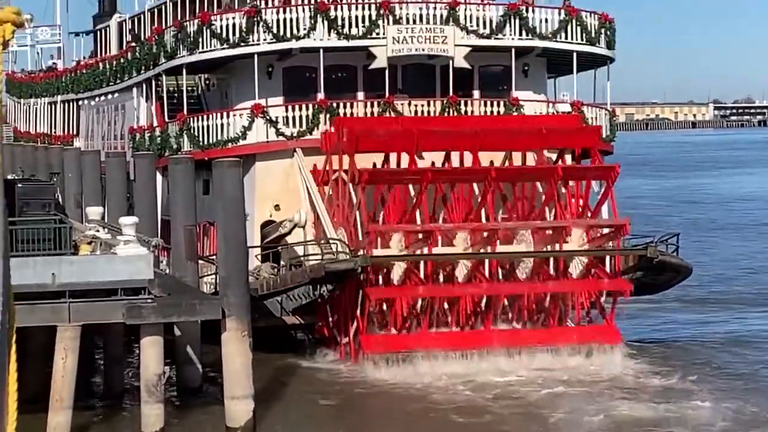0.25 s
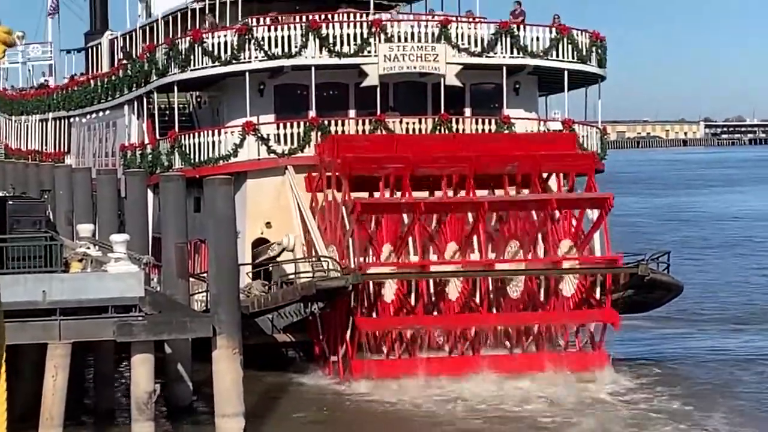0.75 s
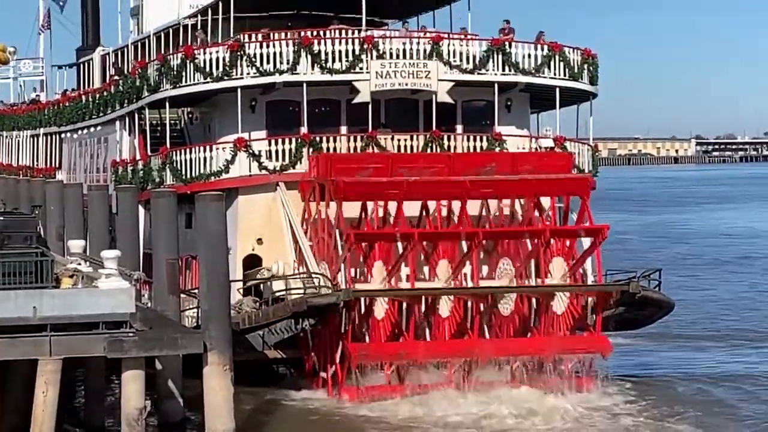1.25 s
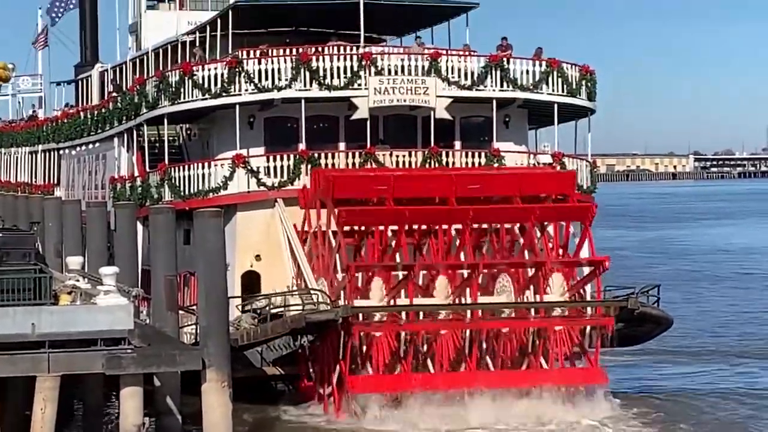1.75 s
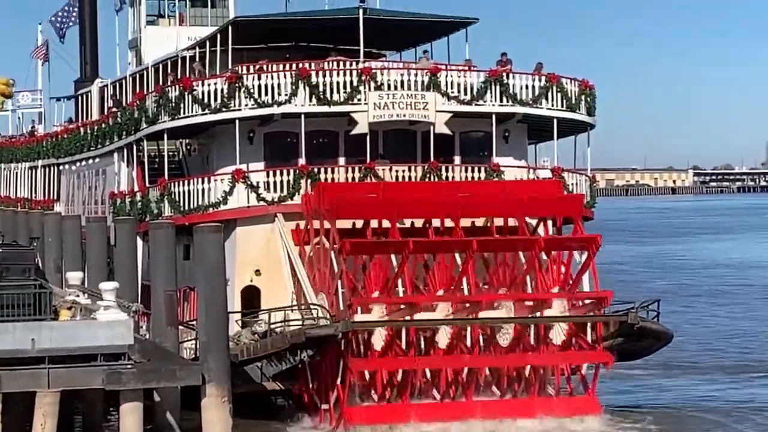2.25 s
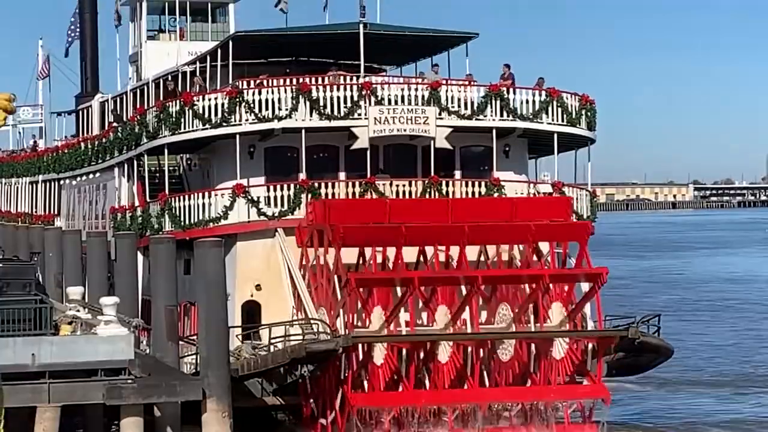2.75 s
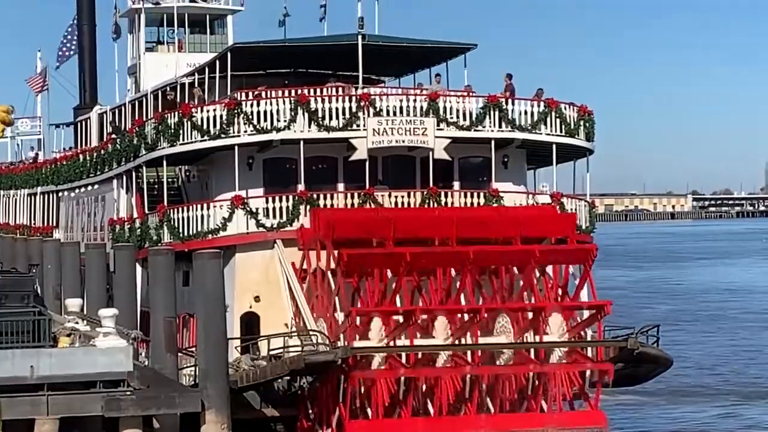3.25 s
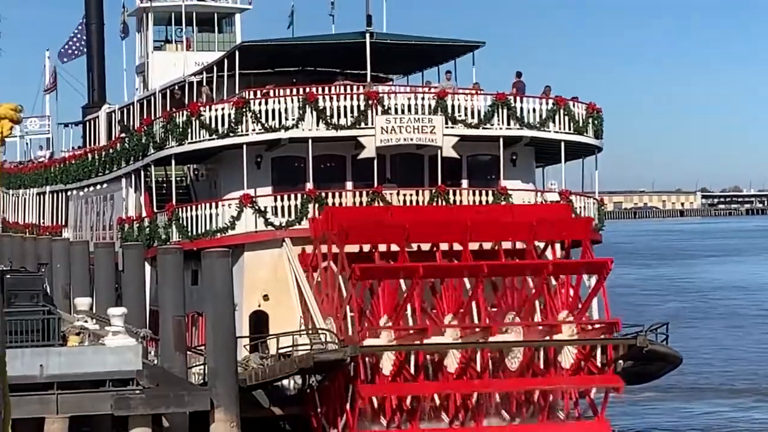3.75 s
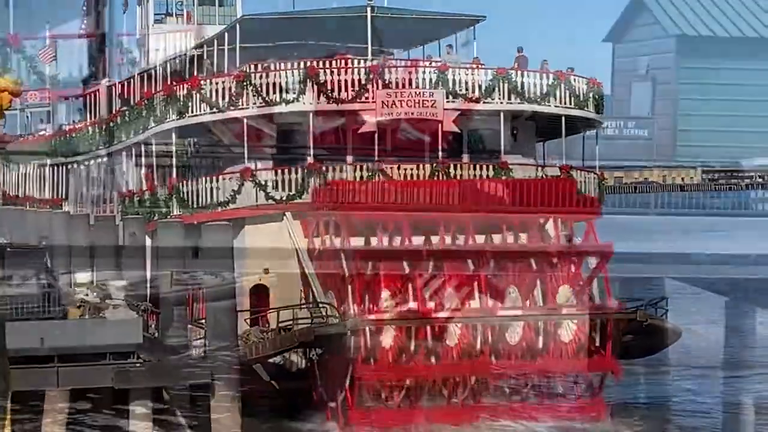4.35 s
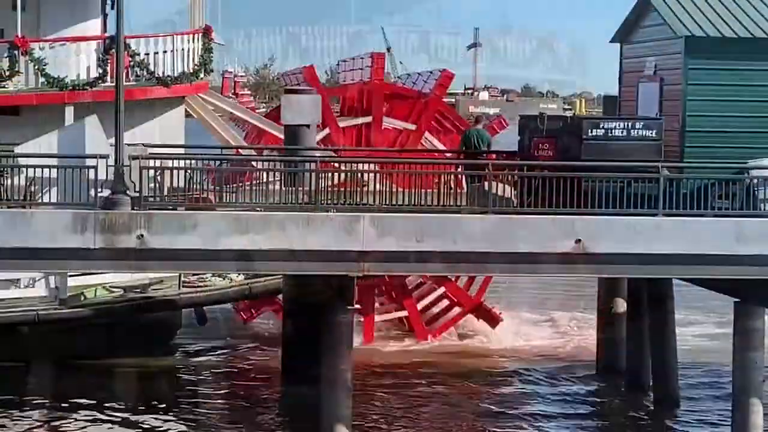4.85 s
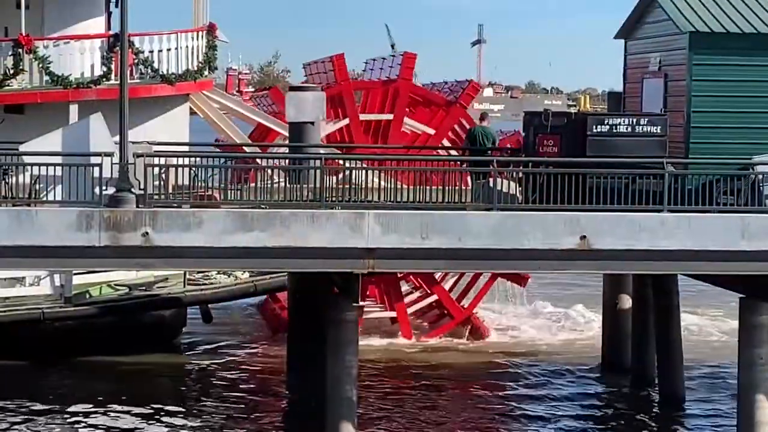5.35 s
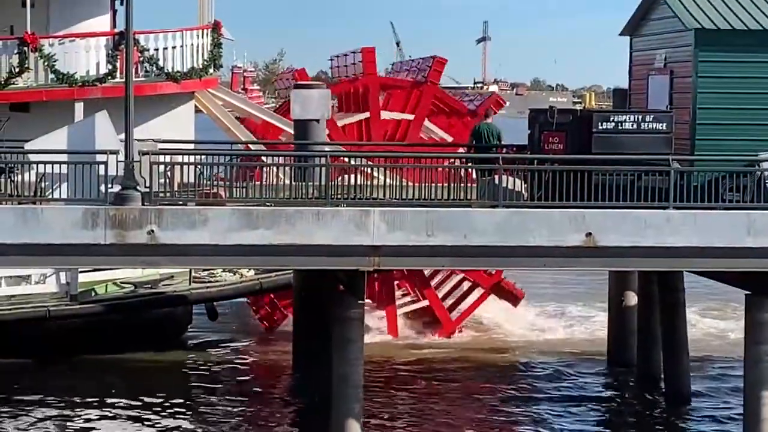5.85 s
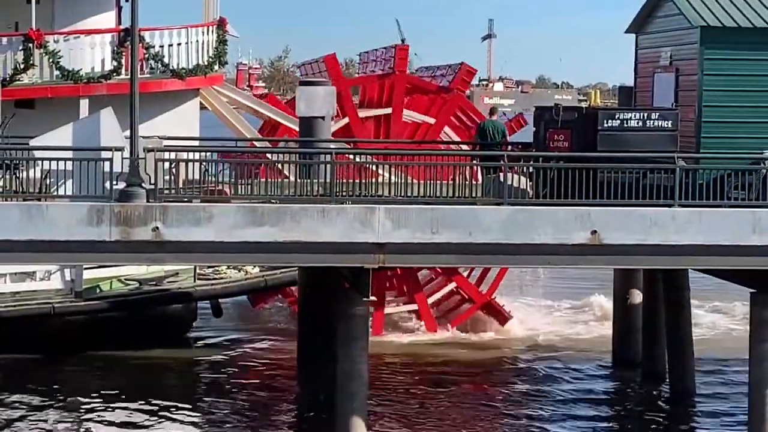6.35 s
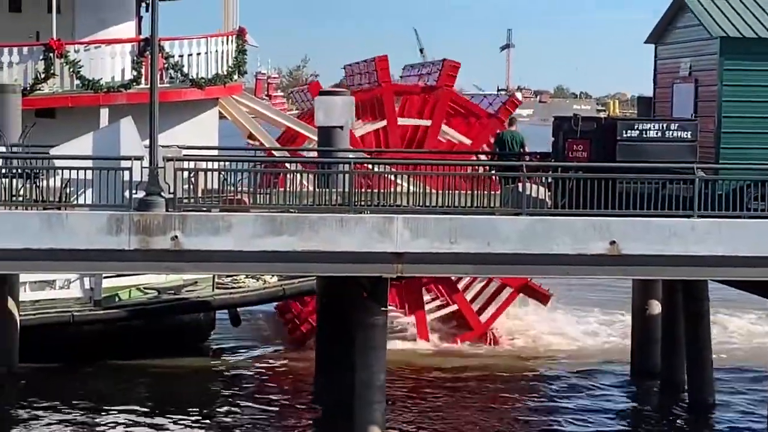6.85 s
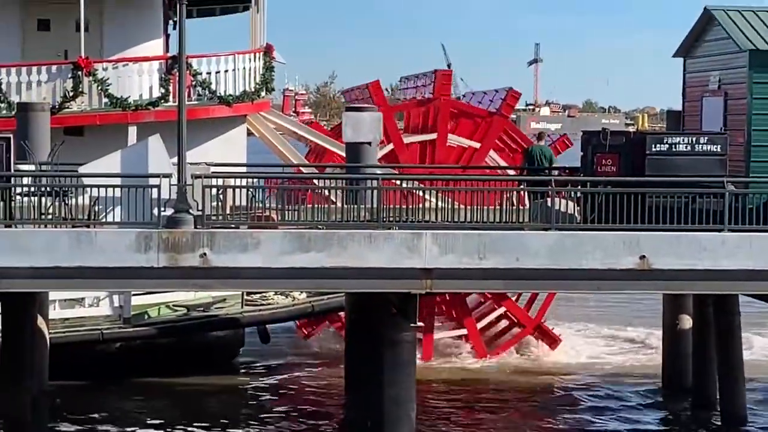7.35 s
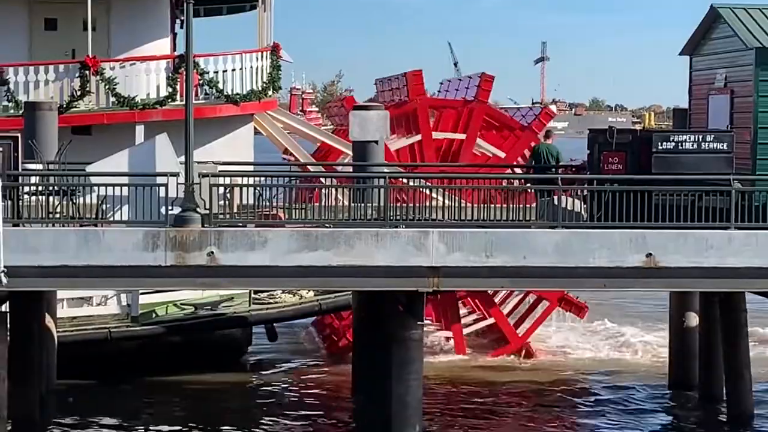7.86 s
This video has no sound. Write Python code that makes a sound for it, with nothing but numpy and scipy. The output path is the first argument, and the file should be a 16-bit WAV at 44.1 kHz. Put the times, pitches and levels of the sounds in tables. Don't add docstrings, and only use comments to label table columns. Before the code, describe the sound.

Beside a river dock, a big paddle wheel turns steadily. Each blade slaps in with a soft swell of splash and spray about every 0.7 seconds, over a continuous bubbly roar. A boat engine throbs low underneath. Wind rumbles and flutters on the handheld stereo microphone, strongest at the start, with occasional dull thumps.

```python
import sys
import numpy as np
from scipy import signal
from scipy.fft import rfft, irfft, next_fast_len
from scipy.io import wavfile
from scipy.ndimage import uniform_filter1d, map_coordinates

SR = 44100
rng = np.random.default_rng(int(sys.argv[2]) if len(sys.argv) > 2 else 0)


def store_pcm(level_fs):
    pcm = np.round(np.clip(level_fs, -1, 1) * 32767).astype(np.int16)
    wavfile.write(sys.argv[1], SR, np.atleast_2d(pcm).T)


def volts(x):
    e = np.asarray(x, float) / 20
    return 10 ** e


N = 358159

# (pitch [Hz], level [dB per Hz])
WIND_COLOUR = [(15, -29), (24, -13), (35, 1), (50, 3), (80, -1.5), (130, -11.5), (220, -16.5), (300, -23.5),
               (380, -28), (600, -61)]
# (pitch [Hz], likeness [0-1])
WIND_ALIKE = [(30, 0.64), (60, 0.55), (120, 0.39), (210, 0.9), (320, 0.99)]
# (time [s], level [dB])
WIND_STRENGTH = [(0.0, -20), (.3, -24), (.55, -35), (.8, -29), (1.15, -26), (1.4, -30), (1.8, -29),
                 (2.1, -31), (3.2, -33.5), (3.6, -27.5), (4.2, -25.5), (4.9, -33), (5.3, -22.5),
                 (5.8, -25.5), (6.3, -27), (6.6, -28.5), (6.995, -35.5), (7.3, -27.5)]
# (time [s], level over the steady flutter [dB])
GUSTS = [(.12, 2.5), (.23, 8), (.4, 3), (.8, 3), (1.15, 2.5), (1.79, 6), (2.05, -1), (2.65, 0.5),
         (2.838, 4), (3.74, 3), (4.39, 0), (4.8, 1), (5.24, 3), (5.42, -3.5), (5.71, 5), (6.42, 2),
         (6.53, 4.5), (6.7, 2.5), (7.15, 3.5), (7.28, 4.5), (7.92, 1)]
# (time [s], level [dB], pitch [Hz], length [cycles], first way [1 up, -1 down])
THUMPS = [(.215, -24, 110, .6, 1), (.27, -20, 110, .6, 1), (1.781, -22, 220, .6, 1),
          (1.787, -14, 125, .65, 1), (2.648, -14, 100, .55, -1), (2.835, -16, 100, .55, -1),
          (3.735, -22, 120, .6, 1), (5.376, -12.5, 150, .42, 1), (7.4335, -15, 125, .55, -1),
          (7.4375, -12.5, 122, .6, 1), (7.4588, -14, 320, .5, 1), (7.4636, -15, 190, .5, -1),
          (7.473, -16.5, 100, 1.1, -1)]

# (time [s], firing note level [dB], level of the note below it [dB])
ENGINE = [(0.0, -24, -43), (.85, -18.5, -41), (1.1, -23.5, -28), (1.3, -28, -45), (1.75, -57, -30),
          (2.05, -33.5, -26), (2.5, -24.5, -30), (3.25, -22, -32), (3.75, -27, -36), (4.1, -29, -51),
          (4.75, -34.5, -33.5), (5.2, -36, -21.5), (5.55, -24, -33), (6.0, -21, -34), (6.75, -28.5, -22.5),
          (7.3, -43, -52), (7.8, -28, -38), (8.12, -20.5, -26)]

# (time [s], level [dB], pitch [Hz], length [cycles])
AIR_POCKETS = [
    (.86, -32, 612, 7.7),
    (2.52, -31.5, 1220, 16),
    (2.985, -31, 564, 6.1),
    (3.03, -37, 530, 9.2),
    (3.055, -33, 677, 11),
    (3.135, -31.5, 608, 15),
    (4.49, -37, 695, 16),
    (4.84, -37, 733, 18),
    (6.67, -37, 651.8, 11),
]

# (time [s], strength over the roar [dB], draining time [s])
BLADES = [(.25, 5.5, 0.21), (.93, 5.5, 0.21), (1.62, 4, .3), (2.32, 6, 0.25), (2.99, 5.5, .26),
          (3.75, 4, .1), (4.49, 5, 0.17), (5.2, 6.5, .12), (5.94, 5, 0.12), (6.68, 5.5, 0.12),
          (7.41, 6.5, .14), (8.13, 3.5, .15)]
# (time [s], level [dB])
SLOSHES = [(.55, 1.5), (1.15, 0), (1.87, 0.5), (3.25, 0.5), (3.51, 2), (3.63, 1), (4.75, 1.5), (4.95, 1.5),
           (5.6, 2), (5.8, 2.5), (6.19, 2.5), (7.0, 1.5)]
# (pitch [Hz], level [dB per Hz])
WATER_COLOUR = [(200, -1), (340, -4.5), (430, -2), (690, 1), (860, -6), (1290, -3.5), (1550, -9),
                (1810, -4.5), (1890, -6.5), (2070, -16.5), (2240, -12.5), (2540, -16.5),
                (3450, -15), (3700, -17), (4480, -17.5), (5080, -22.5), (5680, -16), (7320, -22.5),
                (8100, -19.5), (8950, -18.5),
                (9050, -17), (9350, -25), (9700, -25.5), (10450, -20), (11000, -29.5), (11950, -20),
               (12100, -24.5), (12800, -32), (13400, -38), (13800, -32), (14200, -39), (14300, -29)]
# (pitch [Hz], likeness [0-1])
WATER_ALIKE = [(340, 0.95), (700, 0.84), (860, 0.67), (1100, 0.7), (1350, 0.96), (1550, 0.061),
               (1810, 0.99), (2070, 0.59), (2330, 0.63), (2580, 0.14),
               (2850, 0.41), (3190, 0.22), (3450, 0.39), (3650, 0.11), (4100, 1), (4500, 0.44),
               (4800, 0.53), (5400, 0.71), (6000, 0.46), (6460, 0.22), (7750, .99), (8100, 1), (9100, 1),
               (9400, 0.023)]
# (pitch [Hz], level difference [dB])
PORT_BALANCE = [(340, 0.1), (1550, -2), (2330, -0.6), (2670, 3), (2930, 2), (3100, 0.5), (3530, -3.5),
                (4130, 0.5), (5170, 5), (6720, -1), (8350, 0), (8960, -0.5)]
# (pitch [Hz], phase [radians])
PORT_LEAD = [(800, 0), (1500, -.3), (2150, 1), (2500, .5), (2950, -3), (3500, 1.3), (3700, .3), (4050, 0),
             (5200, 3.1), (6250, 4), (6600, 1.3), (7800, 0), (8950, -2.3), (9020, 0)]
ROAR_DB = [-37, -40, -50.5, -52]
BLADE_SHARES = [0.15, 0.67, 0.87, 0.77]
FLICKER_DB = [0.32, 0.13, 0.39, 0.75]

# (from [Hz], to [Hz], share of moments heard [0-1], smoothing [frames])
MID_KEPT = [(9000, 9350, .87, 2), (9350, 9500, .35, 2), (9500, 9700, .05, 1), (10550, 11300, .07, 1),
            (11300, 12000, .005, 1), (12900, 13200, .55, 3), (13200, 13550, .35, 2), (13550, 13750, .02, 1),
            (14280, 22050, 0, 1)]
SIDE_KEPT = [(9000, 9750, .33, 3), (9750, 10480, .06, 1), (11050, 11200, .06, 1), (11200, 11650, 0, 1),
             (12030, 12800, .015, 1), (12800, 13500, .02, 1), (13500, 14250, 0, 1), (14280, 14480, .4, 1),
             (14500, 22050, 0, 1)]
# (from [s], to [s], pull)
SIDE_FAVOURED = [(.1, .65, 1.2), (1.3, 2.25, 2.6), (2.25, 3.27, 1.2), (5.22, 5.45, 1.5)]


def unit(x):
    return x / np.sqrt(np.mean(np.mean(np.atleast_2d(x), axis=0) ** 2) + 1e-20)


def along(points, hz):
    f, v = np.transpose(points)
    return np.interp(np.log(hz + 1), np.log(f + 1), v)


def curves(rows):
    s, *cols = np.transpose(rows)
    return [np.interp(np.arange(N) / SR, s, c) for c in cols]


def wobble(rate):
    return map_coordinates(rng.standard_normal(400), [np.arange(N) * min(rate, 45) / SR])


def peak(s, rise_s, fall_s):
    t = np.arange(N) / SR - s
    return np.exp(-(t / np.where(t < 0, rise_s, fall_s)) ** 2)


def swing(s, db, hz, cycles):
    turns = (np.arange(N) / SR - s) * hz
    return -volts(db) * np.sin(2 * np.pi * turns) * np.exp(-(turns / cycles) ** 2)


def filtered(x, response):
    m = next_fast_len(N + SR // 2)
    return irfft(rfft(x, m) * response(np.fft.rfftfreq(m, 1 / SR)), m)[..., :N]


def patchy(patchy_db):
    z = signal.stft(rng.standard_normal((2, N)), nperseg=512)[2]
    field = uniform_filter1d(rng.standard_normal(z.shape[1:]), size=6, axis=0)
    field = uniform_filter1d(field, size=10, axis=1)
    return signal.istft(z * volts(patchy_db * field / field.std()), nperseg=512)[1][:, :N]


def spread(pair, colour, alike):
    def shares(hz):
        turn = np.arccos(np.clip(along(alike, hz), -1, 1)) / 2
        return volts(along(colour, hz)) * [np.cos(turn), np.sin(turn)]

    mid, side = filtered(pair, shares)
    return np.array([mid + side, mid - side])


def wind():
    strength_db, = curves(WIND_STRENGTH)
    lumps = volts(0.43 * wobble(9) + 1.7 * np.array([wobble(25), wobble(25)]))
    buffet = lumps * spread(patchy(patchy_db=0.7), WIND_COLOUR, WIND_ALIKE)

    flutter_hz = 83.3
    upper = lambda hz: hz ** 4 / (hz ** 4 + flutter_hz ** 4)
    rumble = unit(filtered(buffet, lambda hz: 1 - upper(hz)))
    flutter = unit(filtered(buffet, upper))

    gust_s = 0.05
    flutter_db = -35 + 0.1 * (strength_db - strength_db.mean())
    flutter_db += sum(db * peak(s, gust_s, gust_s) for s, db in GUSTS)
    return volts(strength_db - 1.0) * rumble + volts(flutter_db) * flutter


def thumps():
    return sum(np.sign(way) * swing(*jump) for *jump, way in THUMPS)


def engine():
    firing_db, below_db = curves(ENGINE)
    above_db = -31.5 + 0.47 * (firing_db - firing_db.mean())
    turns = 6.79 * np.arange(N) / SR
    # (multiple of the shaft rate, place in the cycle [turns], level [dB])
    notes = [(7, 0, below_db), (8, -.25, firing_db), (9, .03, above_db)]
    throb = 0
    for multiple, lag_turns, db in notes:
        phase = 2 * np.pi * (multiple * turns + lag_turns) + 0.27 * wobble(4.5)
        throb = throb + volts(db + 3 + 1.2 * wobble(8)) * np.cos(phase)
    return throb


def gulps():
    return sum(swing(*pocket) for pocket in AIR_POCKETS)


def bubbles(count, hz, octaves, cycles, scatter_db):
    draw, t = rng.random((count, 3)), np.arange(1200) / SR
    pitch = hz * 2 ** (octaves * (2 * draw[:, 1:2] - 1))
    age = t * pitch / cycles
    size = volts(-scatter_db * np.log(draw[:, 2:] + 0.0013)) * np.sqrt(pitch / hz)
    ring = size * age * np.exp(-3 * age) * np.sin(2 * np.pi * pitch * t * (1 + 0.12 * age))
    start = (draw[:, :1] * N).astype(int) + np.arange(len(t))
    return unit(np.bincount(start.ravel(), ring.ravel(), N + len(t))[:N])


def wheel():
    blade_db = sum(db * peak(s, 0.12, drain_s) for s, db, drain_s in BLADES)
    blade_db += sum(db * peak(s, 0.047, 0.047) for s, db in SLOSHES)

    pair = patchy(patchy_db=1.01)
    large = bubbles(count=3500, hz=907.0, octaves=1.203, cycles=7.64, scatter_db=1.5)
    small = bubbles(count=4000, hz=5500, octaves=1.1, cycles=6, scatter_db=1.8)
    pair[0] += volts(-19 + 0.86 * blade_db) * large + volts(-19) * small
    water = spread(pair, WATER_COLOUR, WATER_ALIKE)

    def ports(hz):
        left = volts(along(PORT_BALANCE, hz) / 2) * np.exp(-.5j * along(PORT_LEAD, hz))
        return np.array([left, 1 / left])

    water = filtered(water, ports)
    bands = [(0, 900), (900, 2400), (2400, 5000), (5000, SR)]  # wash, splash, spray, mist [Hz]
    spatter_db = 0.28 * wobble(25)
    roar = 0
    for (lo, hi), db, share, flicker_db in zip(bands, ROAR_DB, BLADE_SHARES, FLICKER_DB):
        layer = unit(filtered(water, lambda hz: (lo <= hz) & (hz < hi)))
        level_db = db + share * blade_db + spatter_db + 0.19 * wobble(12) + flicker_db * wobble(36)
        roar = roar + volts(level_db) * layer
    return roar


def scene():
    lean = volts(np.array([[.25], [-.25]]))
    return lean * (wind() + engine() + thumps()) + wheel() + gulps()


def thinned(x, kept, pull):
    hz, t, z = signal.stft(x, SR, nperseg=2048)
    favour = pull * sum(weight * ((a < t) & (t < b)) for a, b, weight in SIDE_FAVOURED)
    for lo, hi, share, frames in kept:
        band = (lo <= hz) & (hz < hi)
        claim = np.log(np.sum(np.abs(z[band]) ** 2, axis=0) + 1e-20)
        claim = claim + 2.0 * rng.standard_normal(z.shape[1])
        claim = uniform_filter1d(claim + favour * (hi < 9760), size=frames)
        z[band] *= claim > np.quantile(claim, 1 - share)
    return signal.istft(z, SR, nperseg=2048)[1][:N]


def low_pass(x):
    return signal.sosfilt(signal.butter(12, 14660, fs=SR, output="sos"), x)


def record(dry):
    mid = thinned(dry.mean(axis=0), MID_KEPT, pull=-.7)
    side = thinned((dry[0] - dry[1]) / 2, SIDE_KEPT, pull=1.8)
    return low_pass(np.array([mid + side, mid - side]))


dry = scene()
out = record(dry)
store_pcm(out)
```